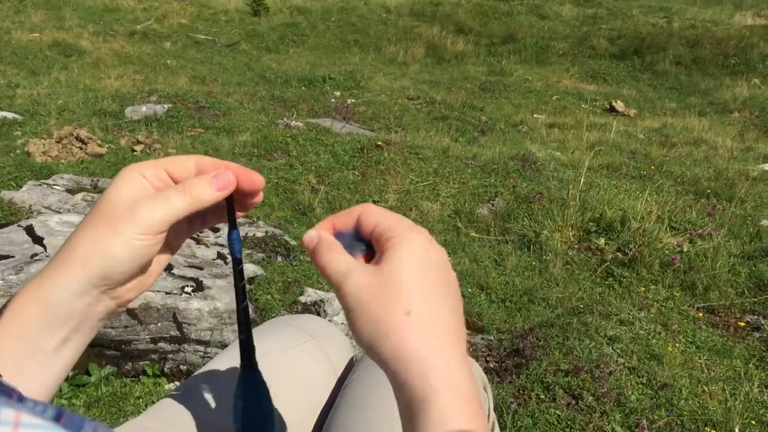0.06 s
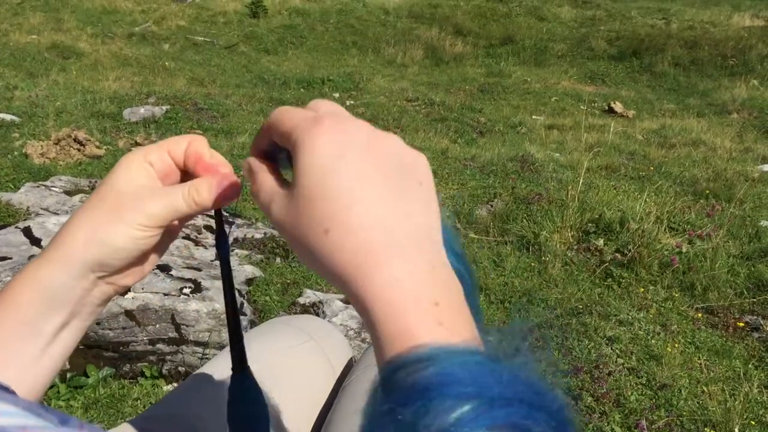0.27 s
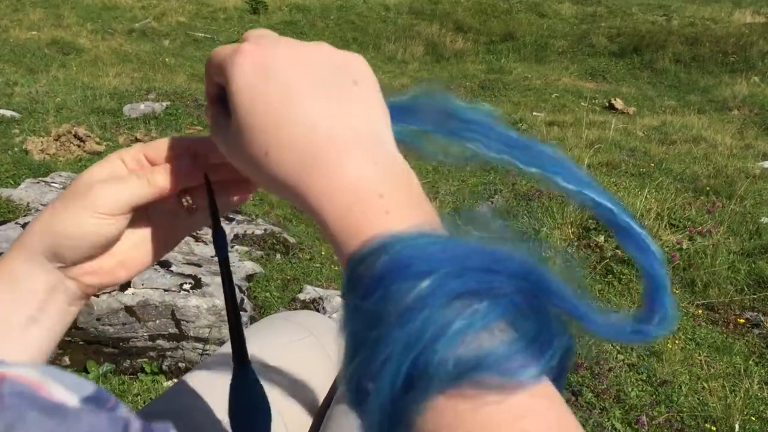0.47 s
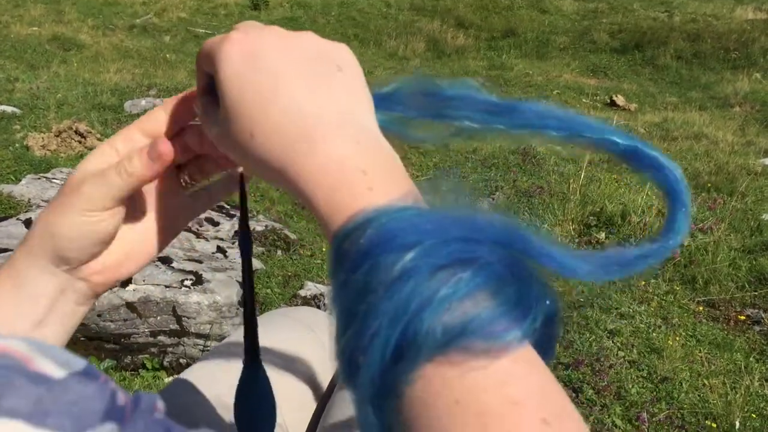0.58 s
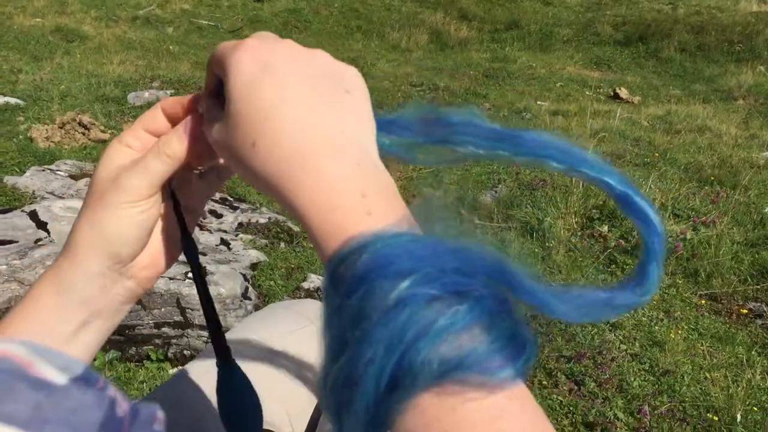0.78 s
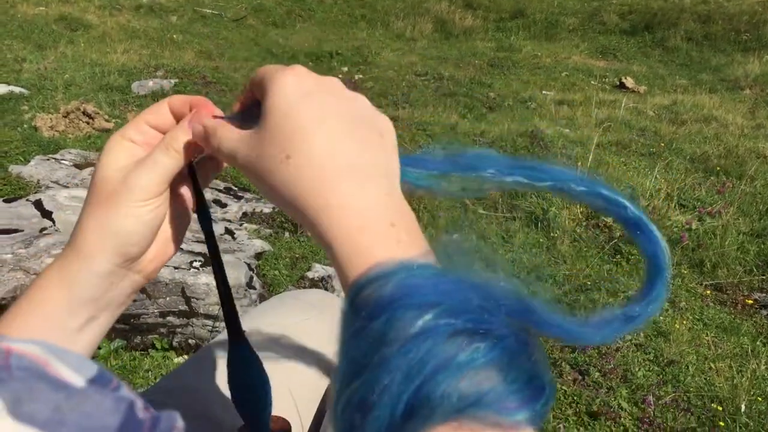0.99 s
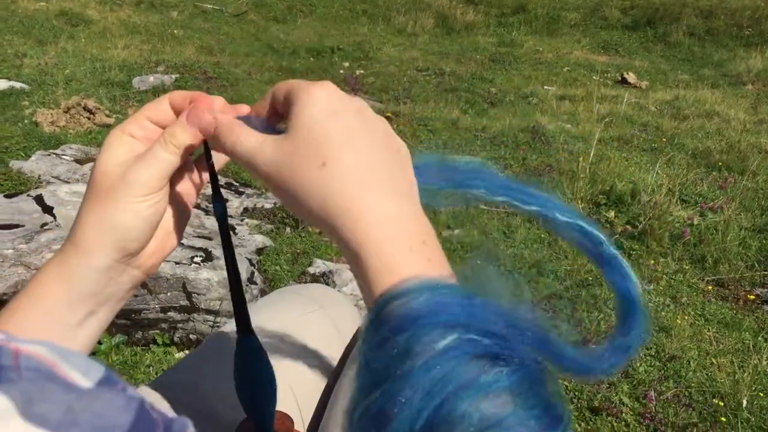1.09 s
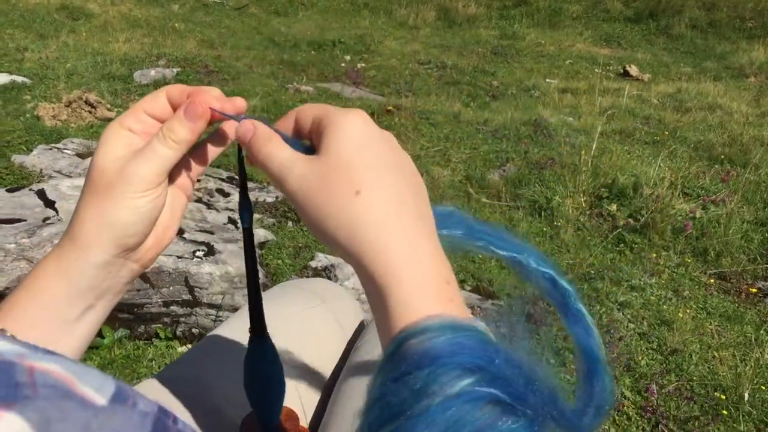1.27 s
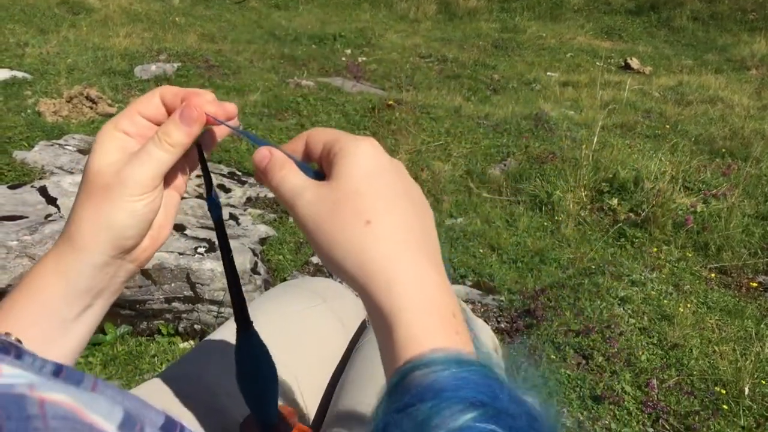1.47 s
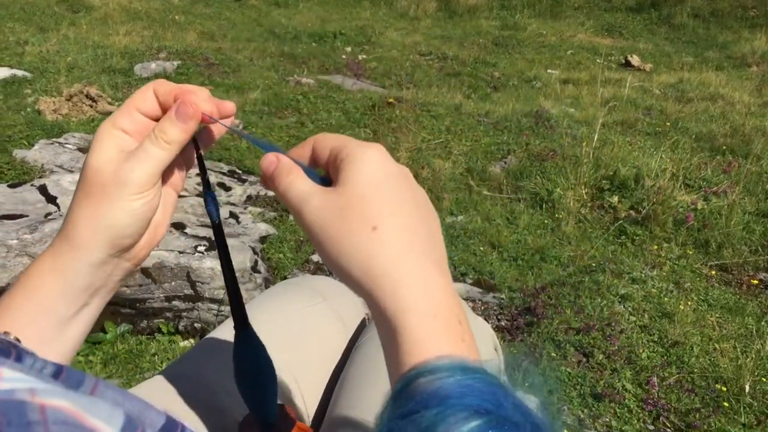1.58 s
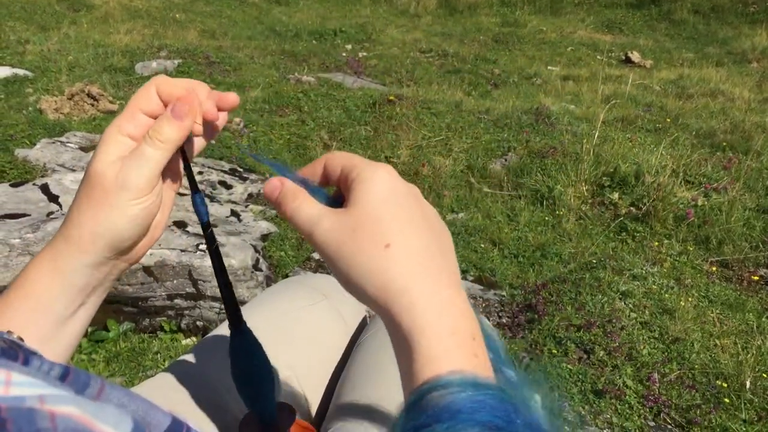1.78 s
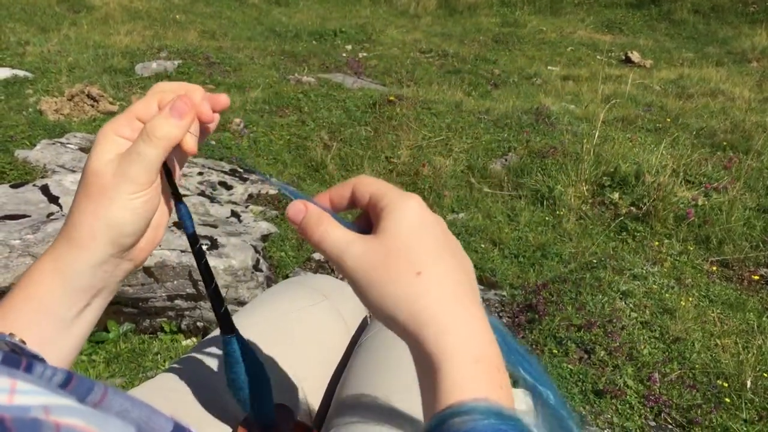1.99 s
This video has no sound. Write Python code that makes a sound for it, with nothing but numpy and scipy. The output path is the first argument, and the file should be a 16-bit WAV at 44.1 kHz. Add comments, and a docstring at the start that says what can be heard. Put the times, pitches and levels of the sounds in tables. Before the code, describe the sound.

Low uneven wind rumble buffeting a bare microphone, with one wooden spindle knock and faint small bumps

```python
"""Wind and a wooden spindle on a grassy hillside

Light wind buffets the port of a bare microphone: swept low lumps of tone and noise over a rumble.
A wooden hand spindle is knocked and rattles, something hollow is tapped: clicks ring banks of modes.
Two grasshoppers tick in the grass as bursts of banded noise; faint thin sine notes far off come and go.
A thin outdoor hiss of coloured noise lies under it all.
"""
import sys
import numpy as np
from scipy import signal
from scipy.fft import rfft, irfft
from scipy.io import wavfile

SR = 44100
rng = np.random.default_rng(int(sys.argv[2]) if len(sys.argv) > 2 else 0)


def unload_audio(sound):
    """Save the sound as a 16-bit wav file, at the path given as the first command line argument."""
    columns = np.transpose(np.atleast_2d(sound))
    # keep every value between -1 and 1, then stretch to whole-number steps
    steps = np.round(np.clip(columns, -1, 1) * 32767)
    wavfile.write(sys.argv[1], SR, steps.astype(np.int16))


def boost(x):
    """Linear amplitude factor 10**(x/20) for a level x in decibels (scalar or array-like)."""
    u = np.asarray(x, float) / 20
    return 10 ** u


N = 90404  # samples in the scene

# outdoor hiss, relative colour: pitch_hz, density_db (per Hz)
AIR_COLOUR = [(20, -6.5), (60, 8.5), (120, 3.5), (200, -7), (280, -6), (400, -0.5), (755, -6.5), (1810, -8),
              (4190, -10), (4900, -13), (5500, -10), (6560, -10), (9500, -12), (10500, -15), (13000, -13),
              (15800, -12.5)]
# eddies that strike the port, before its low cut:
# centre_s, length_s, level_db, swing_hz, glide_hz_per_s (at the centre), flutter_db (relative to the swing)
BUFFETS = [(0.009, 0.028, -46.5, 93, -640, -43), (0.067, 0.013, -51, 70.4, -1170, -32),
           (0.101, 0.017, -50.5, 99, -710, -20), (0.166, 0.02, -42.5, 79, -1910, -19),
           (0.209, 0.019, -36.5, 135, 3250, -36), (0.272, 0.018, -35.5, 104, 3654, -48),
           (0.362, 0.01, -29.5, 83.5, 1640, -20), (0.392, 0.01, -49, 88, -350, -14.5),
           (0.439, 0.013, -52.5, 73, -930, -19), (0.527, 0.024, -29.5, 65.8, -150, -20.5),
           (0.579, 0.0082, -46.5, 95, 1930, -8), (0.617, 0.014, -31.0, 112, 917, -11),
           (0.658, 0.0091, -27.5, 128.3, -1540, -26), (0.706, 0.027, -34, 97.7, 1023, -11),
           (0.782, 0.027, -51, 86.6, -2130, -10), (0.835, 0.0091, -36.5, 105, -1930, -35),
           (0.881, 0.019, -48, 68.0, -780, -21), (0.931, 0.018, -37, 133, 1115, -2.5),
           (0.974, 0.014, -32.5, 87.5, 1474, -12), (1.001, 0.0084, -41.5, 109, -1660, -33),
           (1.058, 0.016, -33.0, 80, -370, -18.5), (1.114, 0.021, -37.0, 105, -1530, -38),
           (1.161, 0.024, -44.0, 76.0, -1070, -21.5), (1.205, 0.014, -42.0, 77, -1580, -12.5),
           (1.249, 0.012, -35.5, 118.5, -4540, -5.5), (1.277, 0.031, -38.5, 82.4, -2130, -30),
           (1.308, 0.038, -49, 138, 1246, -7.5), (1.35, 0.017, -37.5, 95, 2373, -16.5),
           (1.402, 0.016, -35.5, 106.5, 306, -20.5), (1.464, 0.016, -36, 122, 170, -12.5),
           (1.504, 0.028, -33.5, 88.6, -57, -21), (1.567, 0.017, -23, 125.3, -2290, -16),
           (1.621, 0.013, -28, 67, -1020, -31), (1.679, 0.0058, -30, 103.0, -180, -19),
           (1.714, 0.017, -47.5, 100, -100, 1), (1.759, 0.009, -19, 112.5, 4746, -11),
           (1.809, 0.024, -49, 83.0, -2620, -25), (1.839, 0.026, -50.5, 67.5, 591, -27),
           (1.869, 0.011, -54, 75, -2330, -11.5), (2.024, 0.025, -50.5, 97.3, -2110, -14.5)]
# rumble between the eddies, before its lumps and the low cut: time_s, level_db
RUMBLE_LEVEL = [(0, -61), (.15, -61), (.2, -76), (.33, -51), (.48, -49), (.74, -54), (.8, -69), (.92, -45),
                (1.02, -58), (1.3, -52), (1.5, -70), (1.56, -55), (1.65, -61.5), (1.73, -38), (1.79, -63),
                (1.88, -80), (1.92, -70), (2.05, -81)]
# relative colour of the turbulence: pitch_hz, density_db (per Hz)
TURBULENCE_COLOUR = [(15, -45.5), (30, -17), (45, 3), (65, 3), (100, -6), (140, -7), (190, -20), (260, -39),
                     (500, -72)]
# relative colour of an eddy's fast edge: pitch_hz, density_db (per Hz)
FLUTTER_COLOUR = [(60, -50.5), (130, -2.5), (180, 2), (240, -8), (310, -20.5), (400, -32.5), (480, -51.5),
                  (800, -80)]
# faint hollow taps: start_s, peak_db, contact_cut_hz
TAPS = [(0.004, -67.5, 600), (0.829, -60, 1300), (0.843, -57.5, 990), (1.332, -64, 590),
        (1.637, -56.5, 1800)]
# modes of the hollow thing, before each blow's own spread: pitch_hz, level_db, t60_s
HOLLOW_MODES = [(536, -8.5, 0.11), (876, -12, 0.062), (965, 2, 0.08), (1393, 0, 0.066)]
# two grasshoppers, one a row: first_stroke_s, period_s, stroke_length_s
GRASSHOPPERS = [(0.0125, 0.05658, .004), (0.017, 0.0593, .003)]
# their relative loudness over time: time_s, first_db, second_db
GRASSHOPPER_LEVELS = [(0, -72.5, -70), (.2, -70.5, -75.5), (.5, -75, -81), (.75, -69.5, -71.5),
                      (1.1, -81, -71), (1.3, -81, -71.5), (1.6, -73, -73), (2.05, -72.5, -72.5)]
# resonances of the scraped wing: pitch_hz, width_hz, level_db
WING_RESONANCES = [(6600, 1500, -0.5), (7370, 1000, 0), (8880, 2200, 6), (11130, 770, -3.5),
                   (13200, 600, -1.5), (15100, 2300, 1.5)]
# blows on the spindle: start_s, peak_db, contact_cut_hz, rattle_s, rattle_db (relative to the blow)
KNOCKS = [(0.5777, -30.5, 2490, 0.038, -17), (0.8360, -47, 1470, 0.013, -19),
          (0.8740, -51, 1970, 0.07, -10), (0.8815, -46, 1060, .01, -27)]
# modes of the spindle, before each blow's own spread: pitch_hz, level_db, t60_s
SPINDLE_MODES = [(434, -6.5, 0.025), (640, -15, 0.0064), (863, -10, 0.11), (972, 2, 0.008),
                 (1304, -12.5, 0.11), (1495, 10.5, .006), (1857, -3, 0.016), (2130, -0.5, 0.0072),
                 (3390, -11, 0.024), (5310, 13, 0.018)]
# thin notes far off, birds or small bells, before swell and waver: start_s, pitch_hz, level_db, swell_s, t60_s
CHIMES = [(0.705, 2860, -71, 0.017, 0.32), (0.797, 4810, -73, 0.009, 0.34),
          (0.815, 4340, -63.5, 0.023, 0.24), (0.845, 1800, -76, 0.0067, 1.5),
          (1.40, 2826, -77, 0.017, 0.21)]


def rms_one(x):
    """Scale to unit rms."""
    return x / np.sqrt(np.mean(x ** 2) + 1e-20)


def in_time(rows):
    """Columns of a table, joined by straight lines in time."""
    s, *columns = np.transpose(rows)
    return [np.interp(np.arange(N) / SR, s, column) for column in columns]


def coloured(spectrum):
    """White noise shaped to the given dB per Hz, then set to rms 1."""
    hz = np.maximum(np.arange(N // 2 + 1) * SR / N, 1)
    point_hz, point_db = np.transpose(spectrum)
    gain = boost(np.interp(np.log(hz), np.log(point_hz), point_db))
    return rms_one(irfft(rfft(rng.standard_normal(N)) * gain, N))


def drift(pole_hz):
    """Slow random wander with spread 1: noise through two equal low-pass poles."""
    r = np.exp(-2 * np.pi * pole_hz / SR)
    wander = signal.lfilter([1], [1, -2 * r, r * r], rng.standard_normal(N + SR))
    return rms_one(wander[SR:])  # the first second lets the filter settle


def around(centre_s, length_s):
    """The samples within five lengths of an event."""
    return slice(max(int((centre_s - 5 * length_s) * SR), 0), int((centre_s + 5 * length_s) * SR))


def ring(push, hz, t60):
    """One mode as a two-pole resonator: a unit click starts a decaying sine of height 1."""
    r, w = boost(-60 / (t60 * SR)), 2 * np.pi * hz / SR
    return signal.lfilter([0, np.sin(w)], [1, -2 * r * np.cos(w), r * r], push + 1e-18)


def soften(clicks, cut_hz):
    """A soft contact is a low-passed click."""
    return signal.sosfilt(signal.butter(4, cut_hz, fs=SR, output="sos"), clicks + 1e-18)


def struck(out, start_s, peak_db, push, modes):
    """A push rings every mode with a strength of its own; returns the sum with what was there."""
    body = 0
    for k, (hz, db, t60) in enumerate(modes):
        strength = boost(db + 2.8 * rng.standard_normal())
        body = body + (-1) ** k * strength * ring(push, hz, t60)
    body = boost(peak_db) * body / np.abs(body).max()
    return out + np.pad(body, (int(start_s * SR), N))[:N]


def outdoor_hiss():
    """Thin coloured noise whose level wanders slightly."""
    level_db, patchy_db, pole_hz = -68.5, 1.0, 32.0
    return boost(level_db + patchy_db * drift(pole_hz)) * coloured(AIR_COLOUR)


def wind():
    """Each eddy swings the pressure in a gliding, rough, fluttering lump; a lumpy rumble fills the gaps."""
    swing_width, flutter_width = 0.5, 0.75  # envelope spreads, in eddy lengths
    noise_share = 0.47  # turbulence's part of a lump's power
    lump_db, lump_pole_hz = 3.5, 19  # wander of the rumble
    low_cut_hz = 36.7
    t, out = np.arange(N) / SR, np.zeros(N)
    turbulence, fast = coloured(TURBULENCE_COLOUR), coloured(FLUTTER_COLOUR)
    start_turns = rng.random(len(BUFFETS))
    for (s, length, level_db, hz, glide, flutter_db), turn in zip(BUFFETS, start_turns):
        near = around(s, length)
        u = t[near] - s
        shape = 1 / np.cosh(u / (swing_width * length))
        # the pitch glides through the middle of the eddy and levels off on both sides
        cycles = turn + hz * u + glide * length ** 2 * np.log(np.cosh(u / length))
        swing = np.sqrt(2 - 2 * noise_share) * np.sin(2 * np.pi * cycles)
        lump = shape * (swing + np.sqrt(noise_share) * turbulence[near])
        out[near] += boost(level_db) * lump * np.sqrt(np.sum(shape ** 2) / np.sum(lump ** 2))
        edge = np.exp(-.5 * (u / (flutter_width * length)) ** 2)
        flutter = edge * fast[near]
        flutter *= np.sqrt(np.sum(edge ** 2) / np.sum(flutter ** 2))
        out[near] += boost(level_db + flutter_db) * flutter
    gust_db, = in_time(RUMBLE_LEVEL)
    out += boost(gust_db + lump_db * drift(lump_pole_hz)) * coloured(TURBULENCE_COLOUR)
    # the port's low cut, run both ways
    return signal.sosfiltfilt(signal.butter(2, low_cut_hz, "high", fs=SR, output="sos"), out)


def taps():
    """Soft touches ring the modes of something small and hollow."""
    out = np.zeros(N)
    click = np.arange(SR // 5) == 0
    for s, peak_db, cut_hz in TAPS:
        out = struck(out, s, peak_db, soften(click, cut_hz), HOLLOW_MODES)
    return out


def grasshoppers():
    """Steady strokes of a leg on a wing: bursts of hiss, each favouring other resonances."""
    jitter_s, stroke_spread_db, band_spread_db = .001, 1.5, 3.5
    t, out, bands = np.arange(N) / SR, np.zeros(N), []
    for hz, width, db in WING_RESONANCES:
        band = signal.butter(2, [hz - width / 2, hz + width / 2], "band", fs=SR, output="sos")
        bands.append(boost(db) * rms_one(signal.sosfilt(band, rng.standard_normal(N))))
    for (first, period, length), level_db in zip(GRASSHOPPERS, in_time(GRASSHOPPER_LEVELS)):
        for s in np.arange(first, N / SR, period):
            late, loud, *colour = rng.standard_normal(2 + len(WING_RESONANCES))
            near = around(s, length)
            shape = np.exp(-.5 * ((t[near] - s - jitter_s * late) / (length / 2)) ** 2)
            hiss = sum(boost(band_spread_db * c) * b[near] for c, b in zip(colour, bands))
            out[near] += shape * boost(level_db[near] + stroke_spread_db * loud) * hiss / 2
    return out


def spindle():
    """A blow and its dying rattle of small dull contacts ring the wood's modes."""
    rattles_per_s, rattle_cut_hz = 800, 1500  # mean rate of random contacts, and their dullness
    out, u = np.zeros(N), np.arange(SR // 5) / SR
    for s, peak_db, cut_hz, rattle_s, rattle_db in KNOCKS:
        chance, height = rng.random((2, len(u)))
        contacts = (chance < rattles_per_s / SR) * (2 * height - 1)
        rattle = boost(rattle_db) * contacts * np.exp(-(u / rattle_s) ** 4)
        push = soften(u == 0, cut_hz) + soften(rattle, rattle_cut_hz)
        out = struck(out, s, peak_db, push, SPINDLE_MODES)
    return out


def chimes():
    """Single thin partials that swell softly, waver in the moving air and fade."""
    waver_db, waver_pole_hz = 3.0, 20
    out = np.zeros(N)
    for s, hz, db, swell, t60 in CHIMES:
        u = np.maximum(np.arange(N) / SR - s, 0)
        level = boost(db - 60 * u / t60 + waver_db * drift(waver_pole_hz))
        out += level * (1 - np.exp(-u / swell)) * np.sin(2 * np.pi * hz * u)
    return out


def scene():
    """All sources at one microphone, as a single channel."""
    return (outdoor_hiss() + wind() + taps() + grasshoppers() + spindle() + chimes())[None]


def top_cut(x):
    """Nothing passes above the cut-off."""
    return signal.sosfilt(signal.butter(12, 15910, fs=SR, output="sos"), x)


def record(dry):
    """Deliver the finished mix."""
    return top_cut(dry)


dry = scene()
out = record(dry)
unload_audio(out)
```